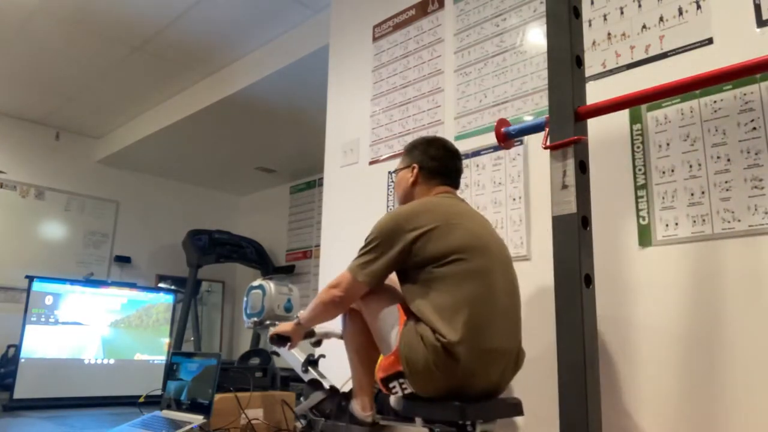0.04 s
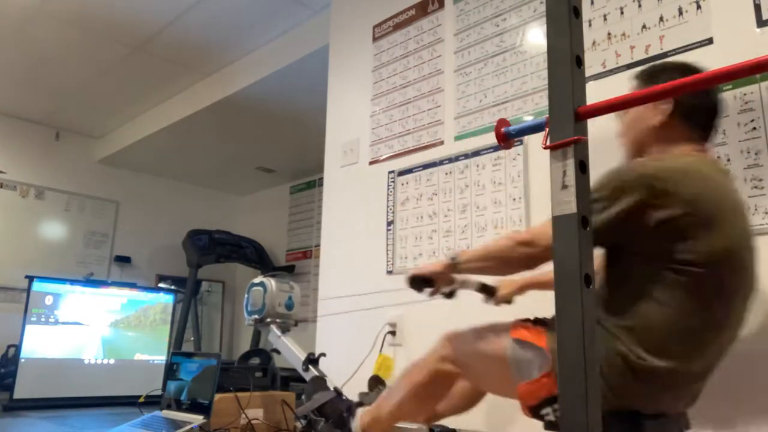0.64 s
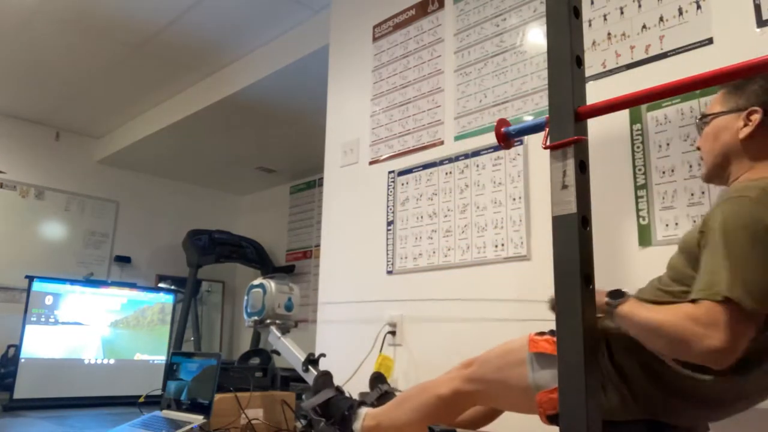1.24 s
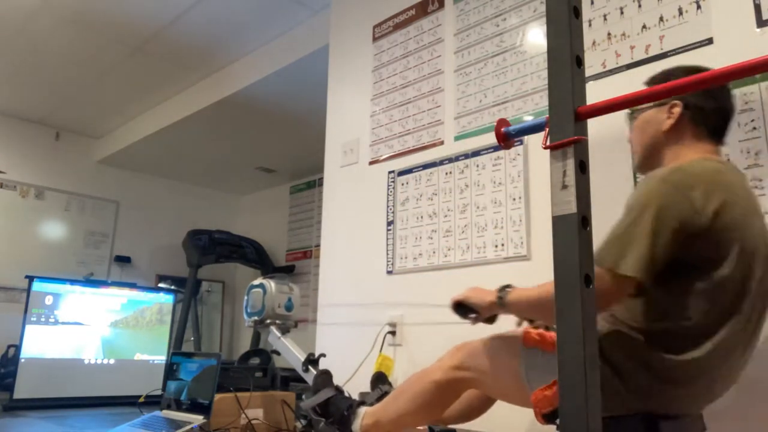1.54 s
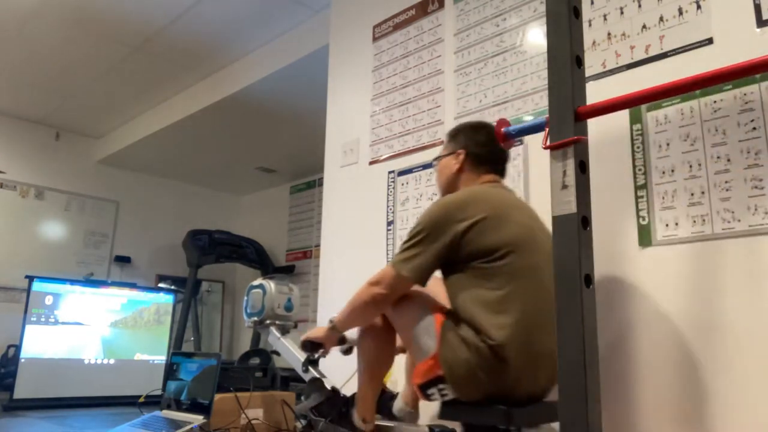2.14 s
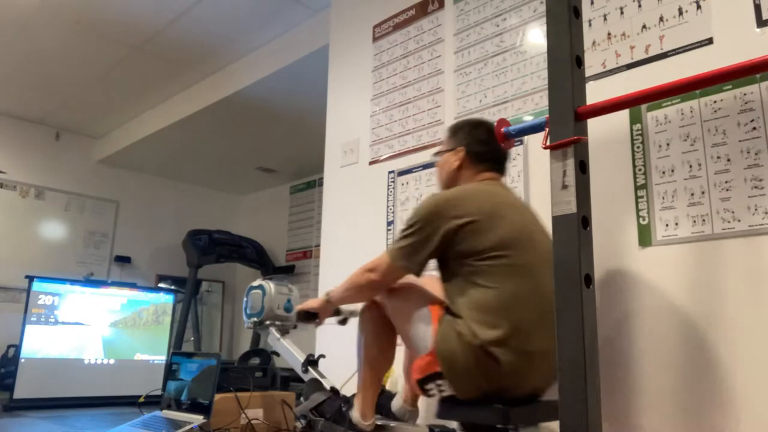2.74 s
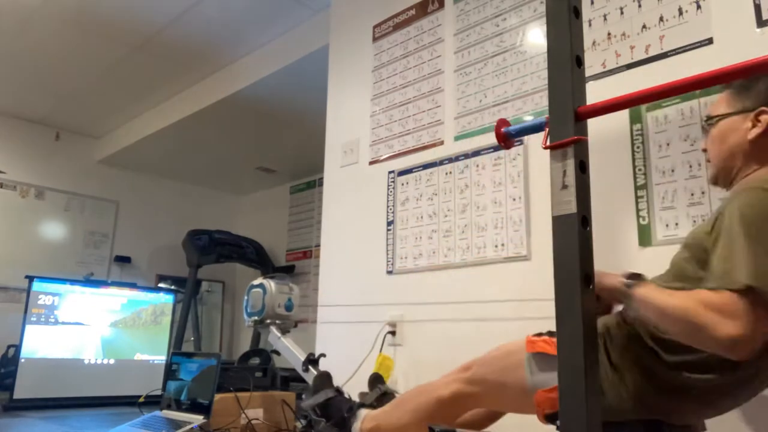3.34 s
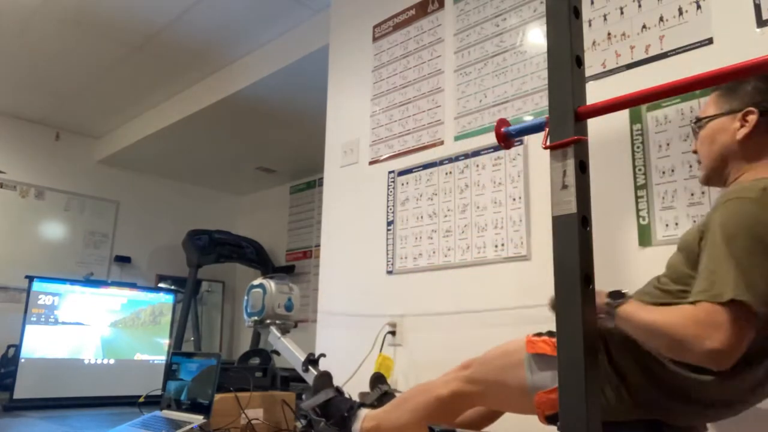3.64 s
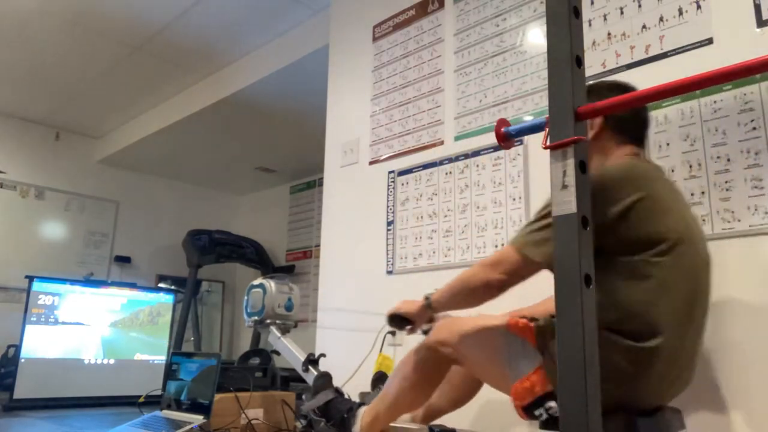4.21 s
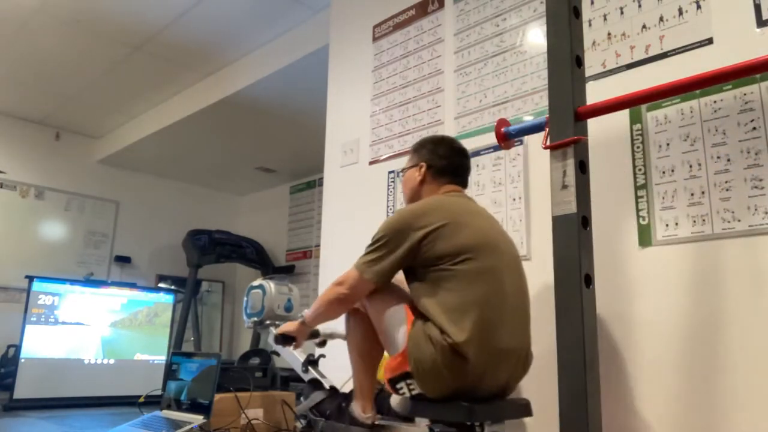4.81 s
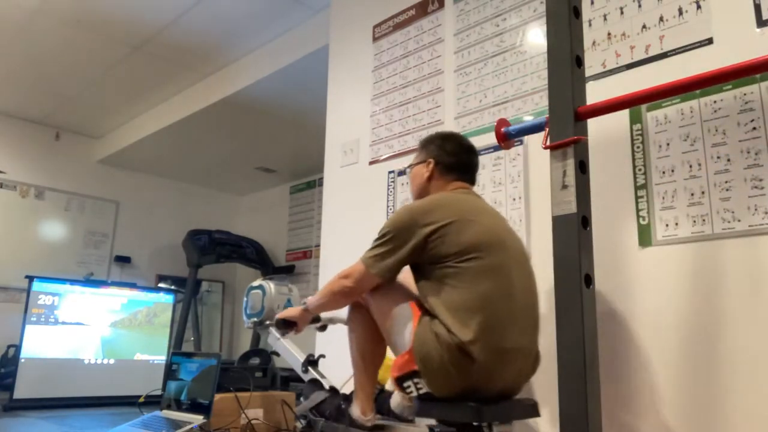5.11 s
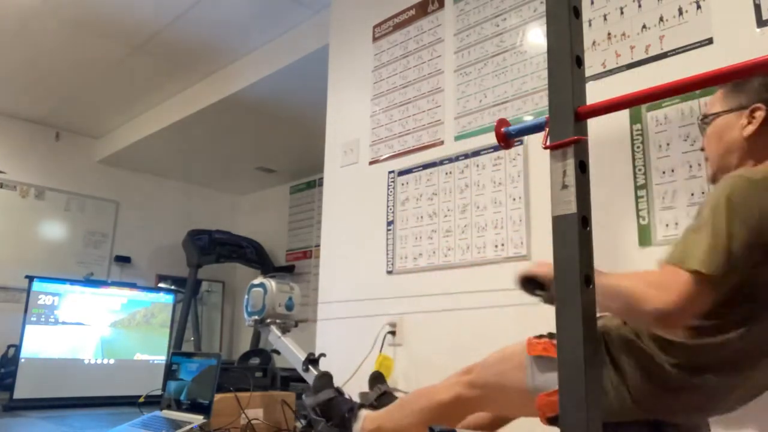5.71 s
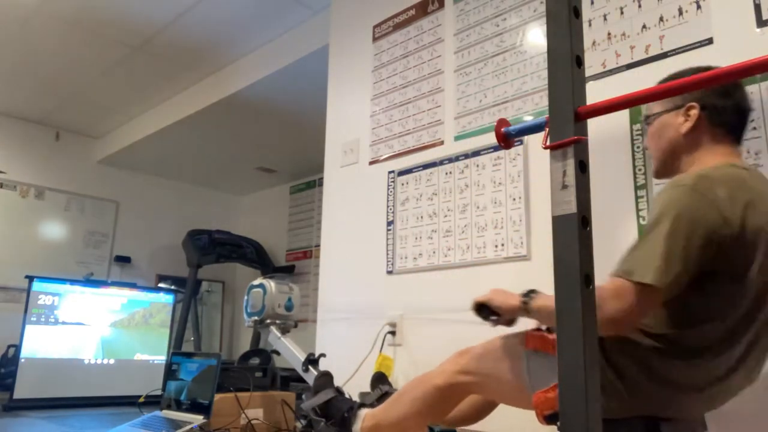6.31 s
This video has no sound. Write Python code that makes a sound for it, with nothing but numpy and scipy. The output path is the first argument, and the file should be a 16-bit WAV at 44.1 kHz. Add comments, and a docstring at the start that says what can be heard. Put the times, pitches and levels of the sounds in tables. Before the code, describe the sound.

A rowing machine is heard up close in a small home gym with a short echo. It opens with the low hum and breathy drone of a coasting flywheel. At about 0.4 seconds the seat and frame knock and the first pull begins: the belt whines upward, the fan rushes and the cable hisses, ticking and rattling near 1 second. The wheel then slows, falling in pitch and gently throbbing. Around 2 seconds the seat rolls forward with knocks and more cable rattle. The second pull comes at about 2.8 seconds with knocks and another rising whir, followed by rattles around 3.3 seconds. The seat rumbles softly forward again near 4.6 seconds, with light clicks. The third pull starts with knocks at about 5.2 seconds, the cable rattles until nearly 6 seconds, and the wheel begins to wind down.

```python
"""A small home gym, close to a belt-driven rowing machine: three strokes on a two-port microphone.
Each pull spins the flywheel up and makes the toothed belt whine; coasting, the fan slows, hums,
throbs once a turn and sinks into a drone. The cable hisses as it is drawn out and rattles as it
slackens and runs back. Seat and frame knock at the turn of each stroke, the seat rolls forward
between pulls, and a short room tail sits behind the machine."""
import sys
import numpy as np
from scipy import signal
from scipy.fft import rfft, irfft
from scipy.io import wavfile

SR = 44100
rng = np.random.default_rng(int(sys.argv[2]) if len(sys.argv) > 2 else 0)


def to_wav(s):
    """Save 16-bit WAV."""
    ch = np.atleast_2d(s).T  # columns
    pcm = np.round(np.clip(ch, -1, 1) * 32767)  # PCM
    wavfile.write(sys.argv[1], SR, pcm.astype(np.int16))


N = 280476
TIME = np.arange(N) / SR
BIN_HZ = np.fft.rfftfreq(N, 1 / SR)


# pulls on the handle: start_s, length_s, push_turns_per_s2, skew (under 1 peaks early)
PULLS = [(0.34, 0.66, 16.545, 0.808), (2.76, 0.7426, 17.733, 0.585), (5.23, 0.714, 17.19, 0.605)]

def flywheel(first_speed=9.099, drag_per_s=0.2329):
    """Speed in turns per second: each pull is an arch of push, and drag slows the wheel in between."""
    push = 0
    for start_s, length_s, peak, skew in PULLS:
        progress = np.clip((TIME - start_s) / length_s, 0, 1)
        push = push + peak * np.sin(np.pi * progress ** skew) ** 2
    coast = np.exp(-drag_per_s * TIME)
    return coast * (first_speed + np.cumsum(push / coast) / SR)


def belt_tension(slack_db=-42, taut_db=-32, swell_db=4):
    """Load on the belt, as its whine's gain in dB: it jumps at the catch, swells and lets go."""
    whine_db = slack_db
    for start_s, length_s, _, _ in PULLS:
        t = TIME - start_s
        taut = plateau(t, attack_s=0.094, hold_s=0.32, release_s=0.21)
        whine_db = whine_db + taut * (taut_db + swell_db * t / length_s - slack_db)
    return whine_db


# partials of the whine: tooth_rate_multiple, full_load_db, no_load_db
WHINE_PARTIALS = [(1, -1.5, -19), (2, 0, -7), (3, 1.5, -11), (4, -3.5, -31)]
# the whine as heard through the belt cover: frequency_hz, gain_db
COVER_RESPONSE = [(800, -10), (1050, -11.5), (1170, -2), (1270, -3), (1380, 0), (1500, -3), (1720, -9),
                  (1950, -3), (2200, 5), (2450, 6), (2750, -2.5), (2970, 3), (3280, -1.5), (3500, -4),
                  (3700, -4.5), (3900, 0.5), (4350, -11.5), (5000, -21)]

def belt_whine(turns, load, whine_db, teeth_per_turn=101, flutter_db=1.5):
    """Meshing teeth whine, with stronger partials under load; the belt flaps and makes them flutter."""
    mesh = teeth_per_turn * turns + 0.068 * wander(39)
    fuzz = amp(-3.5 - 0.5 * load)
    whine = 0
    for k, full_load_db, no_load_db in WHINE_PARTIALS:
        tone = np.sin(2 * np.pi * k * mesh) + fuzz * noise_band(k * mesh, width_hz=155)
        flutter = amp(flutter_db * wander(35))
        level = amp(no_load_db + (full_load_db - no_load_db) * np.sqrt(load))
        whine = whine + level * flutter * tone
    return shaped(whine, COVER_RESPONSE) * amp(whine_db) * throb(turns + 0.035, depth_db=7 * (1 - load))


# belt rubbing on its pulleys: frequency_hz, relative_db
RUB_SPECTRUM = [(60, -60), (500, -13), (900, -9), (1250, -1), (1700, -4.5), (2300, 1), (3000, -1),
                (3900, -4.5), (4700, -20), (5600, -27.5), (8000, -104), (15000, -70)]
# rasp of the taut belt: frequency_hz, relative_db
RASP_SPECTRUM = [(60, -56), (600, -50), (1300, -11.5), (1800, -14), (2500, 0.5), (3900, -8.5),
                 (4700, -12.5), (5600, -27), (7500, -20.5), (15000, -72)]
# scuff of the belt: frequency_hz, relative_db
SCUFF_SPECTRUM = [(60, -54), (600, 6.5), (1300, 0.5), (1800, 4), (2300, 12), (2800, 4), (3800, -3),
                  (4700, -8), (9000, -82)]
# narrow resonances of the belt cover: centre_hz, width_hz, gain_db
COVER_RESONANCES = [(1058, 33, 6), (1160, 11, 3.5), (1722, 30, 9), (2230, 76, 3.5), (2434, 33, 4.5),
                    (2450, 27, -2), (2495, 20, -1), (2960, 50, 2.5), (3236, 95, -3.5), (3500, 150, 3),
                    (3580, 60, -2.5), (3900, 30, -3.5)]

def belt(turns, speed_db, load, whine_db):
    """Under its cover the belt whines, rubs with speed, rasps under load and scuffs once a turn."""
    whine = belt_whine(turns, load, whine_db)
    rub = amp(-34.5 + 1.6 * speed_db) * noise(RUB_SPECTRUM)
    rasp = amp(-30) * load ** 2.06 * noise(RASP_SPECTRUM)
    contact = np.exp(2.24 * (np.cos(2 * np.pi * (turns + 0.059)) - 1))
    scuff = amp(-31.5 + 0.31 * speed_db) * contact * noise(SCUFF_SPECTRUM)
    return resonant(whine + rub + rasp + scuff, COVER_RESONANCES)


# air stirred in the fan housing: frequency_hz, relative_db
AIR_SPECTRUM = [(25, -49), (42, -31), (58, -12.5), (85, -20), (112, -14), (138, -27), (165, -15.5),
                (250, -13.5), (330, -12.5), (420, -12.5), (560, -8), (700, -7.5), (790, -7), (870, -18),
                (1500, -61.5)]
# bands of the fan's roar: turn_rate_multiple, width_hz, base_db, full_load_gain_db
ROAR_BANDS = [(30, 35, -57, -3), (52.2, 87, -47, -1), (59.7, 52, -40.3, 2), (60, 16, -49, 1)]
# surge of the driven fan: frequency_hz, relative_db
SURGE_SPECTRUM = [(150, -55), (228, -16), (290, -32), (540, -30), (615, -0.5), (675, 0), (750, -2),
                  (800, -5), (870, -27), (1400, -69)]
# peaks and dips of the housing and the room: centre_hz, width_hz, gain_db
HOUSING_RESONANCES = [(120, 14, 6), (162, 12, 8), (179, 14, -9), (240, 35, 0), (253, 7.2, -3), (346, 12, 2),
                      (371, 14, -6), (389, 31, 5.5), (428, 7.8, 2.5), (472, 37, 5), (512, 15.7, 3.5),
                      (549, 13, -4), (584, 26, 4.5), (632, 21, 0), (668, 18, 7.5), (694, 9, -2.5),
                      (722.7, 15.4, 3)]

def fan(turns, speed_db, load):
    """Air rushes, surges under load and roars in bands that sweep across the housing's resonances."""
    air = amp(-36 + 1.4 * speed_db) * noise(AIR_SPECTRUM)
    roar = sum(amp(base_db + load_db * load ** 2 + 1.4 * speed_db) * noise_band(k * turns, width_hz)
               for k, width_hz, base_db, load_db in ROAR_BANDS)
    surge = amp(-31.3) * load ** 2.4 * noise(SURGE_SPECTRUM)
    return resonant((air + roar + surge) * throb(turns - 0.03, depth_db=1.0), HOUSING_RESONANCES)


def throb(turns, depth_db):
    """The slightly untrue wheel swells its noise once a turn."""
    return amp(depth_db * np.cos(2 * np.pi * turns))


# knocks of seat and frame: start_s, level_db, clatter_s (a short one is a clean thud)
BLOWS = [(0.363, -19, 0.035), (0.4985, -10.5, 0.0006), (0.507, -20, 0.001), (0.551, -15.5, 0.007),
         (1.97, -13, 0.0025), (1.996, -16.5, 0.0013), (2.147, -17, 0.039), (2.779, -18.5, 0.002),
         (2.788, -17, 0.0041), (2.912, -13.5, 0.001), (2.921, -18, 0.005), (5.244, -17.5, 0.038),
         (5.38, -16, 0.004)]
# ringing of the frame: pitch_hz, relative_db, t60_s
FRAME_MODES = [(254, -24, 0.18), (358, -11.5, 0.11), (486, -2.5, 0.1), (624, 1, 0.014), (940, -8.5, 0.043),
               (1060, -13.5, 0.012)]

def knocks(contact_db=24.5, low_cut_hz=261):
    """A firm contact and a dying clatter ring the frame, which is too small to radiate deep bass."""
    out, t = np.zeros(N), np.arange(SR // 4) / SR
    ring = sum(amp(db - 60 * t / t60_s) * np.sin(2 * np.pi * hz * t) for hz, db, t60_s in FRAME_MODES)
    for start_s, level_db, clatter_s in BLOWS:
        clatter = rng.standard_normal(len(t)) * np.exp(-t / clatter_s)
        blow = amp(contact_db) * (t == 0) + clatter
        body = signal.fftconvolve(blow, ring)[:len(t)]
        add(out, start_s, amp(level_db) * body / abs(body).max())
    return signal.sosfilt(signal.butter(2, low_cut_hz, "highpass", fs=SR, output="sos"), out)


# hiss of the cable: frequency_hz, relative_db
CABLE_SPECTRUM = [(100, -75), (2000, 8), (4500, 0), (5800, -13), (7200, 3.5), (9200, 7.5), (10500, 3),
                  (12800, 2.5), (14000, -19), (15700, -26)]

def cable_hiss(speed_db, slips_per_s=900):
    """Many tiny slips make a hiss that idles with the wheel and builds as the cable is drawn out."""
    drawn = sum(plateau(TIME - start_s - 0.005, attack_s=0.069, hold_s=0.56, release_s=0.11)
                for start_s, *_ in PULLS)
    idle_level = amp(-48 + 1.77 * speed_db)
    draw_level = amp(-42 + 0.36 * speed_db) * drawn
    slips = impulses(slips_per_s) * amp(5.1 * np.minimum(rng.exponential(1, N), 2))
    hiss = colour(rng.standard_normal(N) + 0.53 * unit(slips), CABLE_SPECTRUM)
    return np.hypot(idle_level, draw_level) * hiss


# sharp ticks of the cable: start_s, level_db
TICK_EVENTS = [(0.848, -28), (0.8684, -28), (0.9443, -27), (0.9655, -24), (0.9975, -25), (1.052, -27),
               (2.0502, -30), (2.0922, -22), (2.108, -23), (2.2545, -20), (2.2675, -26), (2.2809, -19.5),
               (3.0455, -32), (3.2378, -21), (3.3087, -21.5), (3.385, -24), (3.8768, -35), (4.4773, -32),
               (4.4875, -26), (4.6523, -23.5), (5.5588, -28), (5.6565, -22), (5.7, -21), (5.7642, -21),
               (5.8418, -23)]

def cable_ticks(pitch_hz=9470, decay_s=0.0014):
    """Each tick is a high click with a brief chatter."""
    out, t = np.zeros(N), np.arange(4096) / SR
    click = np.exp(-t / decay_s) * np.sin(2 * np.pi * pitch_hz * t)
    chatter_fade = 0.62 * np.exp(-t / 0.0013) + 0.27 * np.exp(-t / 0.007)
    for start_s, level_db in TICK_EVENTS:
        chatter = chatter_fade * noise(CABLE_SPECTRUM, len(t))
        add(out, start_s, amp(level_db) * (click + chatter))
    return out


# bursts of rattling: peak_s, level_db, rise_s, decay_s
RATTLE_BURSTS = [(0.885, -35.5, 0.032, 0.052), (0.975, -33, 0.017, 0.064), (2.02, -36.5, 0.044, 0.13),
                 (2.097, -35.5, 0.0093, 0.11), (2.291, -28.5, 0.041, 0.032), (3.243, -30.5, 0.0071, 0.1),
                 (3.41, -33.5, 0.062, 0.038), (4.53, -35.5, 0.07, 0.057), (4.76, -37, 0.066, 0.036),
                 (5.565, -36.5, 0.012, 0.042), (5.69, -33.5, 0.047, 0.081), (5.775, -32, 0.014, 0.15),
                 (5.87, -33.5, 0.048, 0.02)]
# colour of the rattling: frequency_hz, relative_db
RATTLE_SPECTRUM = [(100, -71), (2000, 3.5), (4500, 7), (5800, -10.5), (7200, -3.5), (8800, 6), (10500, 6.5),
                   (12800, 0), (14000, -13), (15700, -12)]

def cable_rattles(contacts_per_s=330, ring_s=0.0008, chatter_db=2):
    """The cable slackens and runs back in bursts of small clicks over a hiss."""
    power = 0
    for peak_s, level_db, rise_s, decay_s in RATTLE_BURSTS:
        t = TIME - peak_s
        burst = np.exp(-np.where(t < 0, (t / rise_s) ** 2, t / decay_s))
        power = power + (amp(level_db) * burst) ** 2
    contacts = signal.lfilter([1], [1, -np.exp(-1 / (ring_s * SR))], abs(impulses(contacts_per_s)))
    chatter = amp(chatter_db) * unit(contacts * rng.standard_normal(N))
    return np.sqrt(power) * colour(rng.standard_normal(N) + chatter, RATTLE_SPECTRUM)


# forward slides of the seat: fastest_s, half_length_s, level_db
SEAT_SLIDES = [(2.104, 0.21, -35), (4.567, 0.37, -34.5)]
# the rail under the rollers: frequency_hz, relative_db
RAIL_SPECTRUM = [(30, -55), (80, -33), (160, -47), (220, -5.5), (400, -9.5), (650, 0), (850, -8),
                 (1500, -12.5), (4000, -21), (7000, -75)]

def seat():
    """Rollers rumble as the seat slides forward, swelling and fading with its speed."""
    level = sum(amp(level_db) * np.exp(-((TIME - fastest_s) / half_length_s) ** 2)
                for fastest_s, half_length_s, level_db in SEAT_SLIDES)
    return level * noise(RAIL_SPECTRUM)


# the hum, loudest where it meets the room's bass resonance: pitch_hz, relative_db
HUM_LEVELS = [(48, -55), (55, -55), (60, -44.5), (64, -45), (69, -36), (73, -37), (77, -40.5), (82, -40)]
# its third harmonic among the room's resonances: pitch_hz, level_db
THIRD_LEVELS = [(150, -58), (172, -57), (190, -46), (210, -51.5), (235, -48.5)]

def blade_hum(speed, turns, blades=6, build_up_s=0.051):
    """Passing fan blades hum; the level follows a little late as the room's resonance builds up."""
    phase = 2 * np.pi * blades * turns
    blade_hz = blades * np.interp(TIME - build_up_s, TIME, speed)
    first = amp(across(HUM_LEVELS, blade_hz) - 3) * (1 + 0.076 * wander(4.2))
    third = amp(across(THIRD_LEVELS, 3 * blade_hz)) * (1 + 0.6 * wander(7.3))
    return first * np.sin(phase) + third * np.sin(3 * phase)


def housing_drone(speed, resonance_hz=513, roar_multiple=59, reach_hz=48, waver_hz=3):
    """At low speed the fan's roar meets the housing's resonance: a breathy tone that bends with it."""
    detune_hz = roar_multiple * speed - resonance_hz
    pitch_hz = resonance_hz + 0.3 * detune_hz + waver_hz * wander(10)
    cycles = np.cumsum(pitch_hz) / SR
    level = amp(-37.5) * np.exp(-(detune_hz / reach_hz) ** 2)
    breath = amp(-12) * noise_band(cycles, width_hz=28)
    return level * unit(np.sin(2 * np.pi * cycles) + breath)


# decay of the gym's reverberation: frequency_hz, t60_s
GYM_DECAY = [(150, 0.26), (600, 0.18), (2500, 0.67), (9000, 0.27), (16000, 0.11)]

def room(x, wet_db, early_samples):
    """Two paths to the microphone: direct sound with a short tail, and early reflections with another."""
    reflections = impulses(per_s=3000, shape=(2, SR // 2))
    hz, t, spectra = signal.stft(reflections, SR, nperseg=256)
    decay = amp(-60 * t / across(GYM_DECAY, hz)[:, None])
    paths = signal.istft(spectra * decay, SR, nperseg=256)[1]
    paths *= amp(wet_db) / np.linalg.norm(paths, axis=1, keepdims=True)
    paths[0, 0] += 1  # direct sound
    early = irfft(np.exp(2j * np.pi * rng.random(early_samples // 2 + 1)))  # scattered, even in colour
    paths[1, :early_samples] += early
    return signal.fftconvolve(x[None], paths, axes=1)[:, :N] / np.hypot(1, amp(wet_db))


def amp(db):
    """Decibels to gain."""
    return 10 ** (np.asarray(db) / 20)


def unit(x):
    """Scales to rms 1."""
    return x / np.sqrt(np.mean(x ** 2) + 1e-20)


def across(points, hz):
    """Reads a curve on a log-frequency axis."""
    point_hz, value = np.transpose(points)
    return np.interp(np.log(hz + 1), np.log(point_hz + 1), value)


def shaped(x, spectrum):
    """Filters x by a spectrum."""
    return irfft(rfft(x) * amp(across(spectrum, np.fft.rfftfreq(len(x), 1 / SR))), len(x))


def colour(x, spectrum):
    """Filters x by a spectrum; rms 1."""
    return unit(shaped(x, spectrum))


def resonant(x, peaks):
    """Filters x by narrow peaks and dips."""
    gain_db = sum(db / (1 + (2 * (BIN_HZ - hz) / width_hz) ** 2) for hz, width_hz, db in peaks)
    return irfft(rfft(x) * amp(gain_db), N)


def noise(spectrum, samples=N):
    """Coloured noise; rms 1."""
    return colour(rng.standard_normal(samples), spectrum)


def impulses(per_s, shape=N):
    """Sparse spikes of random time and strength."""
    return rng.standard_normal(shape) * (rng.random(shape) < per_s / SR)


def wander(hz, bins=4096):
    """Smooth random drift up to about hz; rms 1."""
    real, imag = rng.standard_normal((2, bins))
    return unit(irfft((real + 1j * imag) * np.exp(-0.5 * (BIN_HZ[:bins] / hz) ** 2), N))


def noise_band(cycles, width_hz):
    """A narrow band of noise that follows a rotation; rms 1."""
    phase = 2 * np.pi * cycles
    return wander(width_hz / 2) * np.cos(phase) + wander(width_hz / 2) * np.sin(phase)


def plateau(t, attack_s, hold_s, release_s):
    """An envelope from t = 0: smooth rise, hold at 1, smooth fall."""
    ramp = np.minimum(t / attack_s, (attack_s + hold_s + release_s - t) / release_s)
    return np.sin(np.pi / 2 * np.clip(ramp, 0, 1)) ** 2


def add(mix, start_s, sound):
    """Mixes a sound in at start_s."""
    part = mix[round(start_s * SR):][:len(sound)]
    part += sound[:len(part)]


# the microphone's two ports: frequency_hz, likeness (0-1), left_lead_rad, left_minus_right_db
MIC_PORTS = [(100, 0.99, -0.04, 0.6), (400, 0.95, 0.54, 0.2), (700, 0.92, 1.42, 0.1),
             (830, 0.4, -2.07, 6.0), (1050, 0.22, 2.79, 1.2), (1800, 0.19, 2.08, 6.0),
             (2400, 0.67, 0.84, 10.6), (3200, 0.7, 1.17, 14.4), (4300, 0.63, 0.3, 11.7),
             (5400, 0.42, -0.36, 3.9), (6500, 0.67, 0.16, 1.2), (9000, 0.88, 0.19, 0.0),
             (13000, 0.79, 0.24, 0.0)]

def scene():
    """One flywheel drives fan and belt; the right port hears part of the left's sound, part reflections."""
    speed, whine_db = flywheel(), belt_tension()
    turns = 0.62 + np.cumsum(speed) / SR  # the wheel starts partway round
    speed_db = 20 * np.log10(speed / speed.mean())
    load = amp(whine_db - whine_db.max())  # 1 at the tightest moment
    machine = fan(turns, speed_db, load) + belt(turns, speed_db, load, whine_db) + seat() + knocks()
    machine_paths = room(machine, wet_db=-11.5, early_samples=2048)
    cable = cable_hiss(speed_db) + cable_ticks() + cable_rattles()
    left, reflected = machine_paths + room(cable, wet_db=-10, early_samples=512)
    left = left + blade_hum(speed, turns) + housing_drone(speed)
    likeness = across(np.array(MIC_PORTS)[:, :2], BIN_HZ)
    right = irfft(likeness * rfft(left) + np.sqrt(1 - likeness ** 2) * rfft(reflected), N)
    return np.array([left, right])


def record(dry, right_early_samples=11, top_hz=15800):
    """At the microphone: the right port is shaded in the upper mids and early; both lose the very top."""
    port_hz, _, lead_rad, shade_db = np.transpose(MIC_PORTS)
    left_lead = across(np.c_[port_hz, np.unwrap(lead_rad)], BIN_HZ)
    phase = left_lead - 2 * np.pi * BIN_HZ * right_early_samples / SR
    shade = amp(-across(np.c_[port_hz, shade_db], BIN_HZ))
    right = irfft(rfft(dry[1]) * shade * np.exp(-1j * phase), N)
    lowpass = signal.firwin(511, top_hz, window=("kaiser", 9), fs=SR)
    return signal.oaconvolve(np.array([dry[0], right]), lowpass[None], "same")


dry = scene()
out = record(dry)
to_wav(out)
```